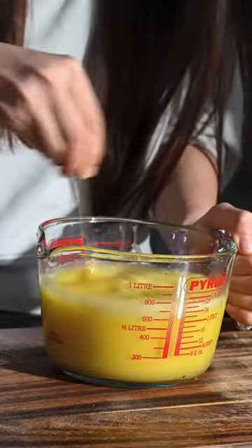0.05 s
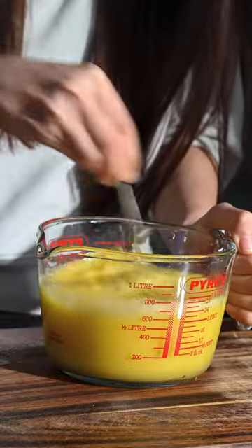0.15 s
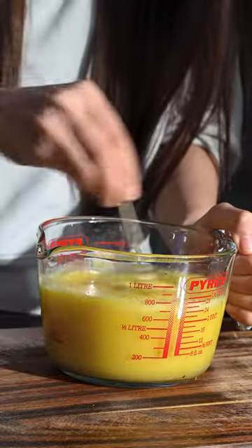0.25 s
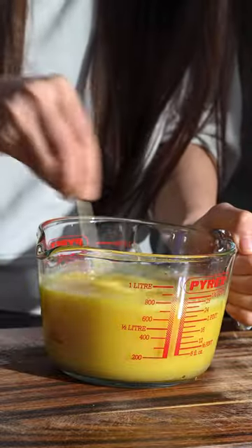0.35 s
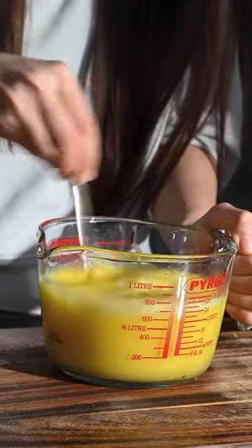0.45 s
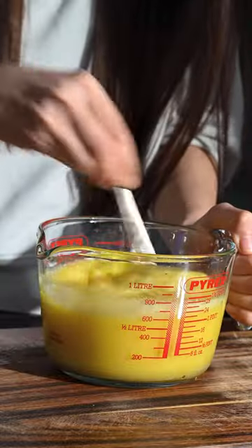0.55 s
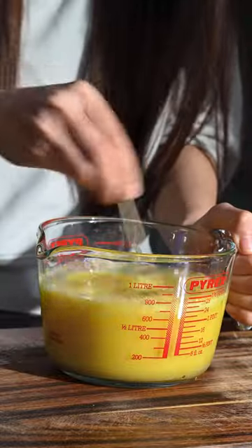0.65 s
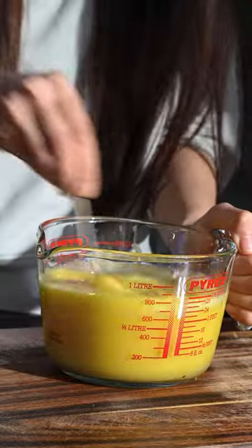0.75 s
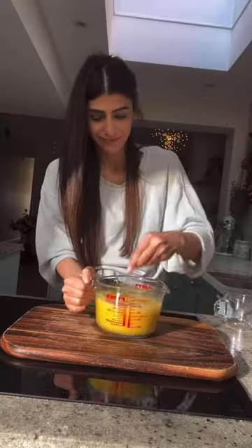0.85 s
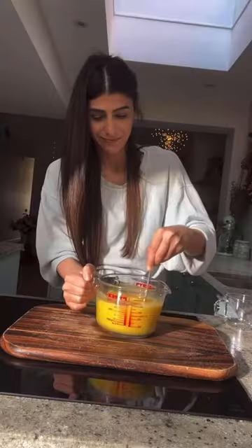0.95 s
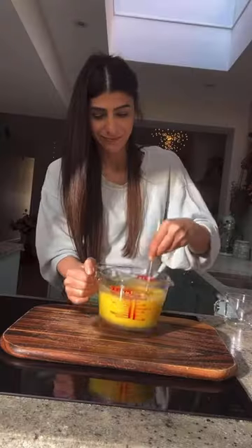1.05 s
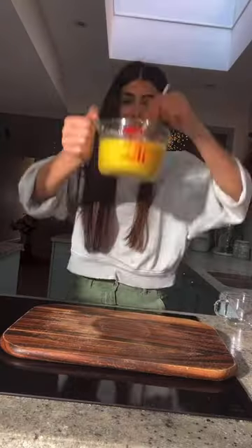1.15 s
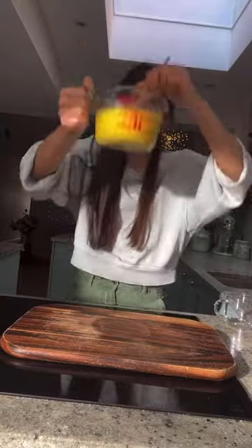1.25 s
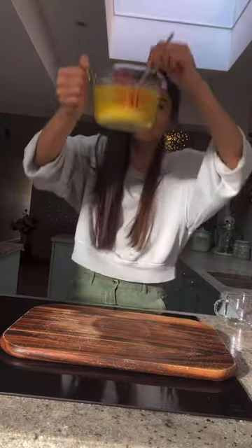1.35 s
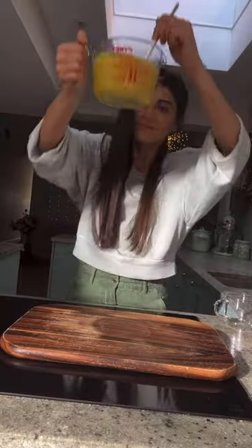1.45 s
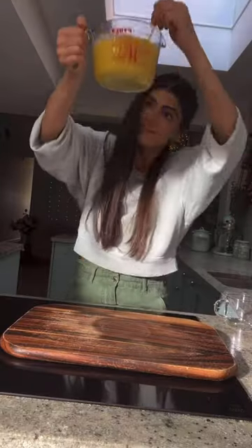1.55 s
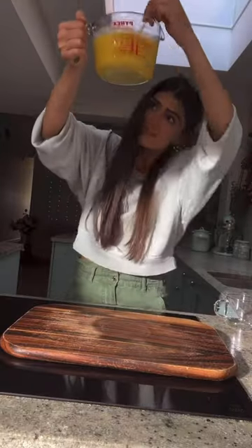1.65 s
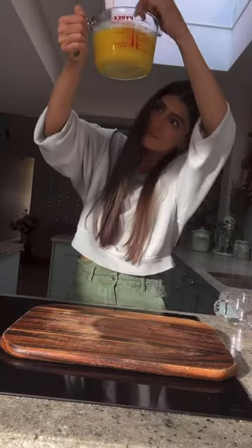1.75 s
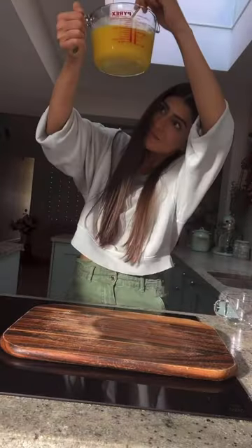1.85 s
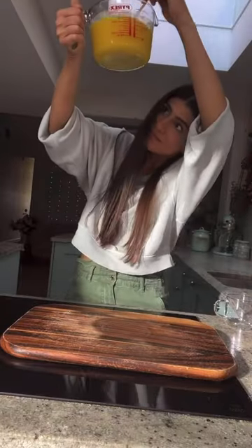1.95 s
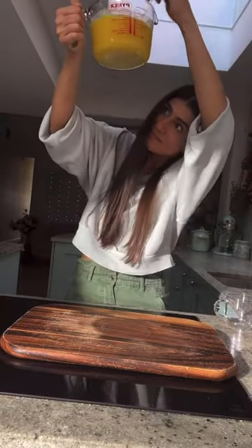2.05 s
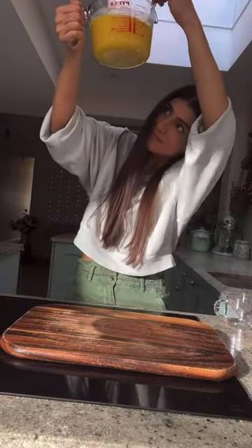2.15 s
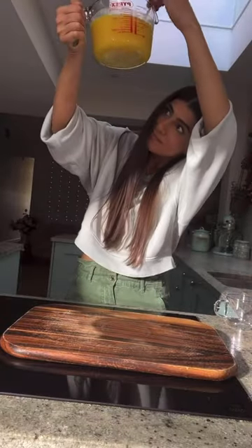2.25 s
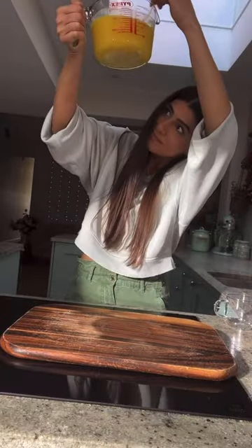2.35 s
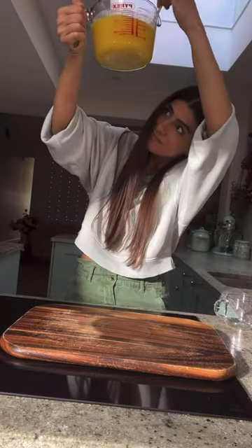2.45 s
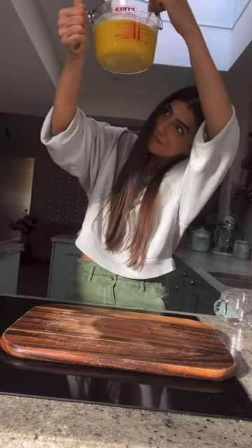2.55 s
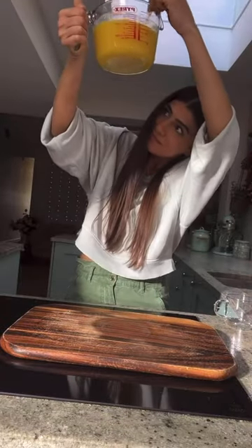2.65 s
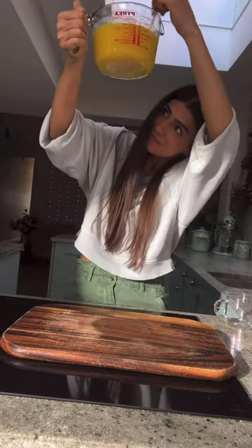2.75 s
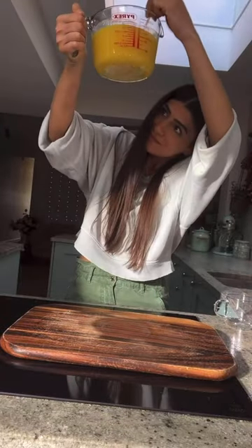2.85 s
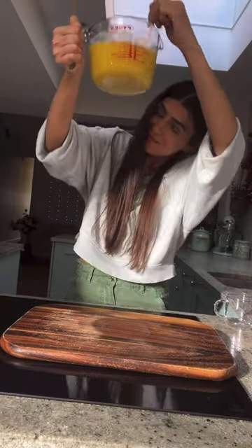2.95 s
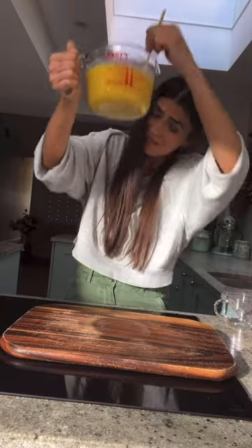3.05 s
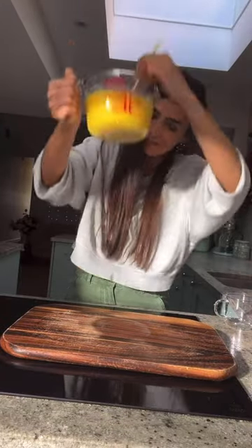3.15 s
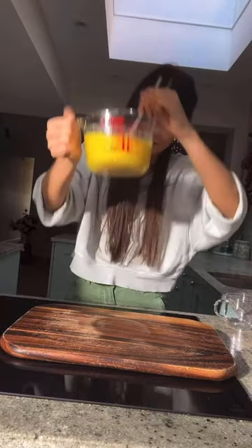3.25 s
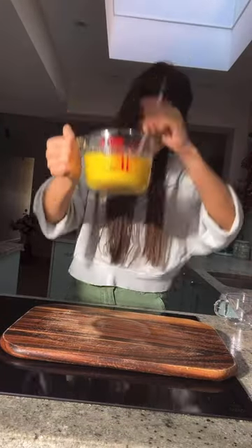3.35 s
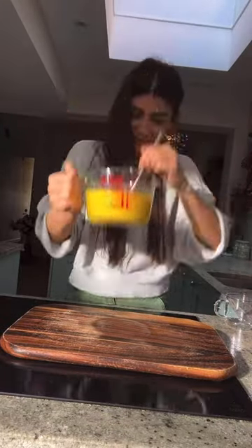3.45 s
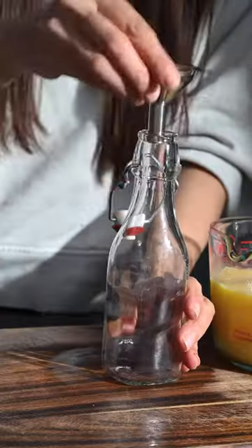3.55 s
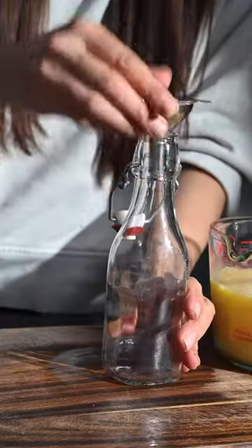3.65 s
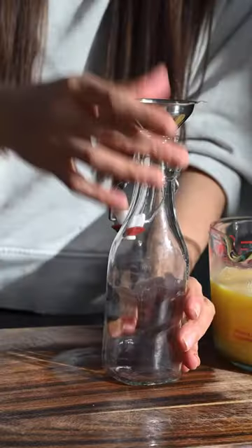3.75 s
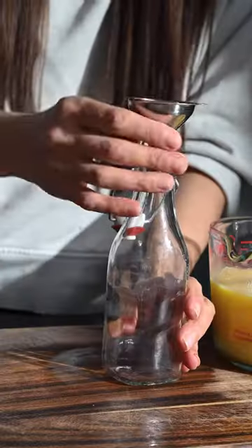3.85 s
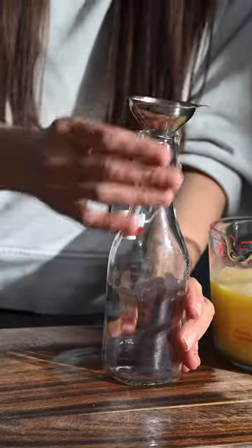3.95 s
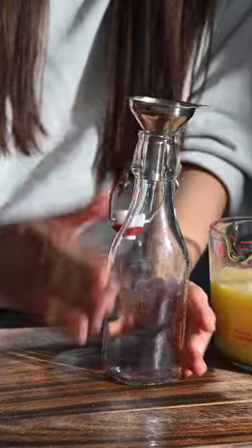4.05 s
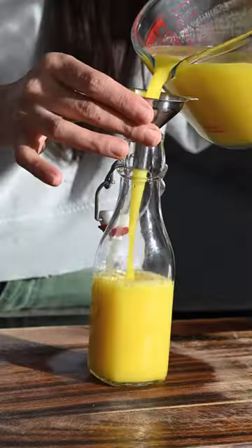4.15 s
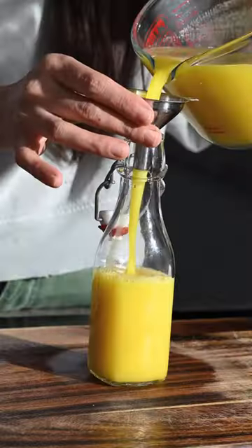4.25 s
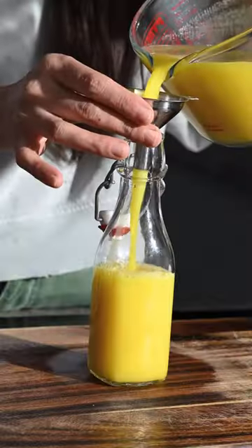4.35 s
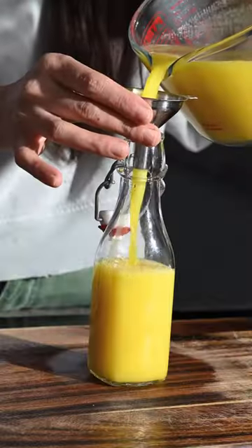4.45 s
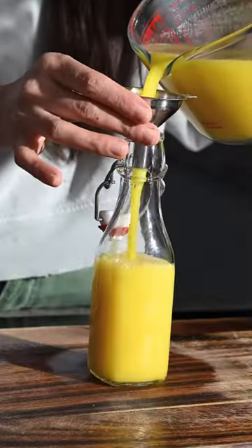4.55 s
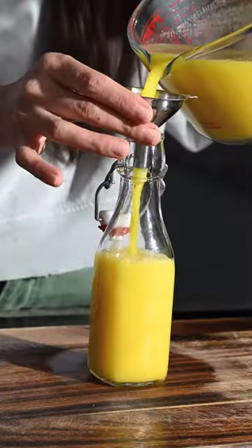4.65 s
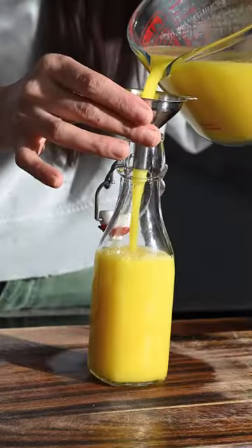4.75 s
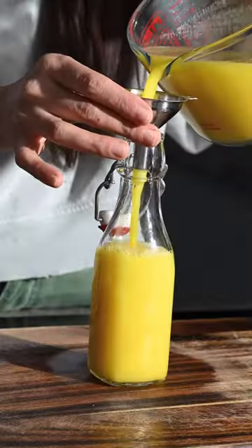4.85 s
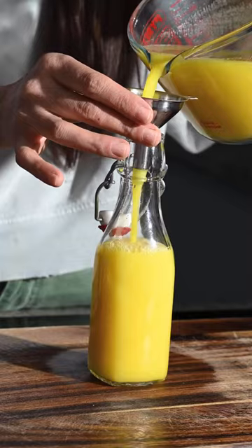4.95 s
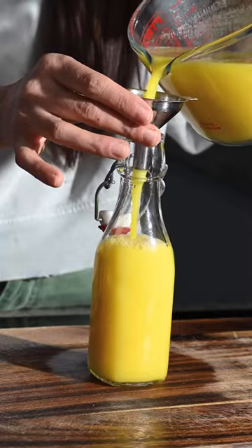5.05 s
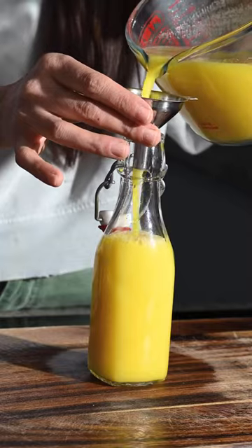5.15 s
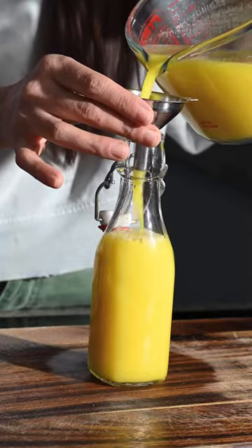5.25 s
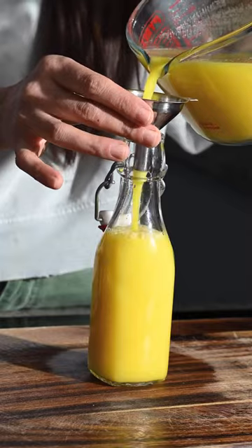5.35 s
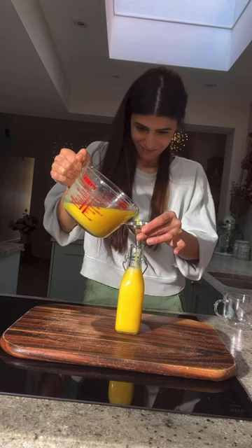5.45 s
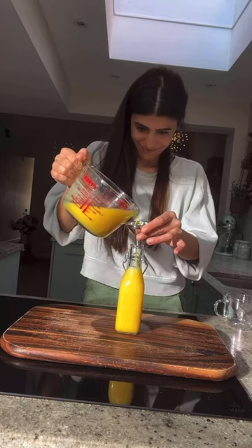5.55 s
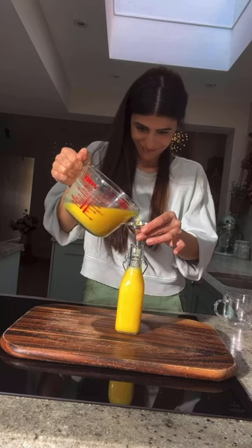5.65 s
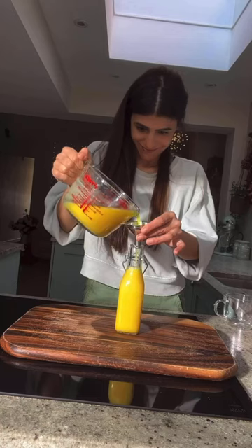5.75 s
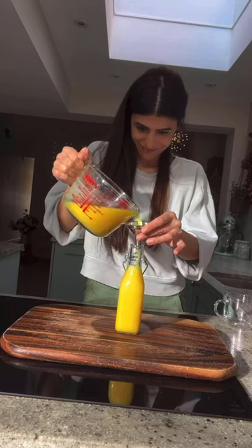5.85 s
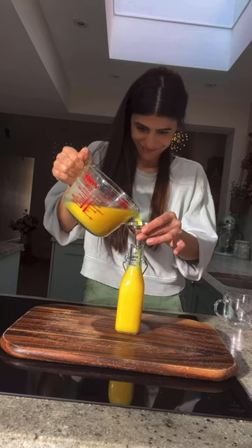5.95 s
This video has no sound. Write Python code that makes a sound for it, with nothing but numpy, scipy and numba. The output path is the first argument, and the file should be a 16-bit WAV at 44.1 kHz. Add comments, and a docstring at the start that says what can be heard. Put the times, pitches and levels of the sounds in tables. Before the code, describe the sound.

A spoon stirs thick juice in a clinking glass jug, then a steel funnel rattles into a bottle and juice trickles in.

```python
"""Kitchen scenes joined by hard cuts. First a spoon stirs thick juice in a glass jug, each blow exciting
its damped modes, close and then further off. At 3.7 s a steel funnel chatters into a bottle neck.
From 4 s juice trickles through it, and the resonances of the air column rise as the bottle fills.
At 5.6 s a wide scene closes on one faint clink. Throughout, a tiled room reverberates after every
blow; the wider scenes carry its air and a fridge hum."""
import sys
import numpy as np
from scipy import signal
from scipy.fft import rfft, irfft
from scipy.io import wavfile
from scipy.ndimage import uniform_filter1d
from numba import njit

SR = 44100
rng = np.random.default_rng(int(sys.argv[2]) if len(sys.argv) > 2 else 0)


def pcm_store(signal):
    """Save signal as 16-bit PCM."""
    levels = np.round(np.clip(np.atleast_2d(signal), -1, 1) * 32767)
    wavfile.write(sys.argv[1], SR, levels.astype(np.int16).T)


N = 264600
T = np.arange(N) / SR


def jug():
    """Impact excitation: each spoon blow cracks and rings the modes near a favoured pitch and the crack."""
    # Modes of jug and spoon. Each row: frequency in Hz, level in dB, undamped t60 in seconds.
    modes = [(195, -6, 0.1), (285, -5, 0.47), (370.4, -9, 0.43), (509.7, -5, 0.16), (860, 7.5, 0.23),
             (1003, 8, 0.14), (1250, -7.5, 0.071), (1270, -7, 0.12), (1967, 4, 0.26), (2156, 6, 0.17),
             (2319, 8.5, 0.067), (2458, -2.5, .2), (2610, -3, 0.18), (3139, -0.5, 0.12), (3404, -3.5, 0.3),
             (3777, 8, 0.079), (3900, -11, 0.08), (4276, 2, 0.17), (4980, -2, .12), (5193, -4, .15),
             (5840, -5, 0.043), (6026, 0, 0.12), (6000, -7.5, 0.033), (7700, -3, 0.11), (9400, -9.5, 0.089),
             (9750, -2.5, 0.075)]
    # Spoon blows. Each row: start in seconds, ring peak in dB, favoured pitch in Hz, contact in ms,
    # crack level in dB relative to the ring, crack centre in Hz, crack width in octaves.
    blows = [(.002, -17.5, 2205, 2.5, -6, 2140, 0.91), (.242, -14, 990, 1.23, -5.5, 900, 1.4),
             (0.245, -9, 3190, 2.65, -4, 3010, 0.53), (.277, -29.5, 7430, 0.23, 6.5, 6340, 0.43),
             (.310, -10.5, 2377, 5.3, -13.5, 2650, 0.69), (.366, -24, 1390, 4.5, 2.5, 1450, 0.87),
             (.385, -21.5, 2295, 12, -6, 2970, 0.24), (0.473, -44, 5800, 1.7, -4.5, 7000, .43),
             (0.524, -37, 6710, 0.833, 2, 4840, .27), (0.597, -23, 2136, 6.6, 0, 3930, 0.48),
             (0.612, -8.5, 3130, 2.8, -22.5, 5140, 0.51), (.630, -29, 3160, 3.8, -19, 2820, 0.46),
             (.655, -14, 1060, 2.8, -1, 1130, 1.02), (.662, -12.5, 1084, 1.9, -4.5, 2354, .27),
             (.677, -16.5, 3582, 2.7, -9, 5320, 0.46), (0.703, -20.5, 1060, 0.89, -16, 2550, 1.3),
             (.745, -15, 1187, 2.3, -6, 1940, 0.8), (0.867, -19, 3540, 0.79, -1.5, 3700, 0.49),
             (0.889, -22.5, 3800, 1, 1, 3660, 0.37), (.933, -47.5, 2130, 5, -5, 3500, 1),
             (1.012, -46, 1320, 6.3, -2, 1120, 0.46), (1.048, -42, 2650, 3.1, -1, 4430, 0.66),
             (1.115, -37.5, 2020, 1.1, -22, 3000, 1.3), (1.241, -37.5, 884, 0.34, 5, 4400, 0.51),
             (1.346, -42, 1067, 3.3, -7.5, 4270, 0.79), (1.892, -41, 2330, 3.3, 6, 6200, 0.97),
             (2.029, -57.5, 1020, 5.7, -18, 2960, 1.6), (2.18, -56.5, 3910, 17.4, -7.5, 5300, 0.26),
             (2.31, -62, 2340, 4.9, -9.5, 3520, .19), (2.49, -43, 1024, 2.5, 5, 4940, 1.06),
             (2.624, -37.5, 4900, 2.6, 12.5, 3470, 1.8), (2.794, -39, 1020, 2.4, 5.5, 4500, 1),
             (2.810, -39, 1042, 5.8, -20, 4120, 0.75), (5.699, -66, 3460, 13.6, 4, 3286, 0.24)]
    hz, db, t60 = np.transpose(modes)
    lifted_s, favour_width_hz = .93, 84
    out = np.zeros(N)
    for s, peak_db, favoured_hz, contact_ms, crack_db, crack_hz, octaves in blows:
        on_board = s <= lifted_s
        ring_share = .18 if on_board else .21 + .041 * contact_ms  # lifted, softer blows ring longer
        wake_db = -13.5 if on_board else -8
        favoured = bell(hz, favoured_hz, favour_width_hz / favoured_hz / np.log(2))
        woken = undb(crack_db + wake_db) * bell(hz, crack_hz, octaves)
        add(out, s, undb(peak_db) * ring(hz, (favoured + woken) * undb(db), t60 * ring_share, contact_ms))
        add(out, s, undb(peak_db + crack_db) * crack(crack_hz, octaves, .54 + .91 * contact_ms))
        if on_board:
            thump = undb(-23.5) * bell(favoured_hz, 690, .5) * crack(240, .51, 9)  # low blows, on the board
            spray = undb(-46) * crack(10000, .45, 8)
            add(out, s, undb(peak_db) * (thump + spray))
    return butterworth(out, 2, 11500, "low")  # soften the blows above 11.5 kHz


def slosh():
    """Friction noise: juice and spoon rub the wall, louder as the stroke gains speed."""
    # Colour of the stirring noise as heard, dull above about 4.8 kHz.
    # Each row: frequency in Hz, gain in dB.
    spectrum = [(120, -60.5), (200, -23.5), (504, -13), (609, -17.5), (735, -7), (1250, -11), (1760, -20),
                (2440, 2), (2700, -5), (4440, 0), (5270, -35), (6050, -20), (7060, -39.5), (12000, -44),
                (15600, -81.5), (22000, -120)]
    # Stirring strokes. Each row: time of full speed in seconds, level in dB, fade in dB per second.
    strokes = [(0, -38, 107.5), (.33, -37.5, 81), (0.768, -31.5, 243), (1.052, -62, 61)]
    rubbing = level(colour(clicks(1700, 1.5), spectrum), -4)
    churning = level(colour(fizz(35, 6), spectrum), -4)
    speed = sum(undb(swell(s, db, 123.5, 0, fade)) for s, db, fade in strokes)
    return (rubbing + churning + level(gurgles(), -18.5)) * speed * gate(0, 1.8)


def gurgles(count=40):
    """Bubble resonance: air pockets in the stirred juice ring as short tones that glide up."""
    out, t = np.zeros(N), np.arange(2500) / SR
    for when, pitch, size in rng.random((count, 3)):
        hz = 420 * 3.5 ** pitch
        glide = np.sin(2 * np.pi * hz * t * (1 + 3.6 * t))
        envelope = t * hz * np.exp(-t * hz / 4.6)
        add(out, .97 * when, undb(-12 * size) * glide * envelope)
    return out


def funnel():
    """Contact chatter: loose steel rattles and knocks on the glass lip, its modes singing until gripped."""
    # Modes of the funnel. Each row: frequency in Hz, level in dB, t60 in seconds.
    modes = [(1250, -4, 0.09), (2680, 0.5, 0.14), (4000, -11, 0.21), (4430, -1.5, 0.238), (5070, -2.5, .3),
             (5600, -10.5, .25), (5672, -8, .25), (5780, -3, .25), (6360, -6.5, 0.22), (7060, -18.5, .3),
             (7420, -3, 0.1), (7920, -13.5, .3), (8620, 0, 0.62)]
    # Spectrum of the rattle. Each row: frequency in Hz, gain in dB.
    spectrum = [(150, -86), (250, -71.5), (372, -27), (604, -35), (694, -16), (1360, -7), (2030, -10),
                (2820, -1.5), (3710, -3), (5250, 4), (8970, -8), (9610, -17), (11800, -11.5), (15600, -30)]
    # Slides on the lip. Each row: time of the bite in seconds, level in dB, rise in dB per second,
    # hold in seconds, fade in dB per second.
    slides = [(3.667, -27.5, 2000, 0.0069, 109), (3.813, -22.5, 502, .068, 150.5),
              (4.053, -50, 3000, 0.0018, 704)]
    # Hard knocks. Each row: start in seconds, peak in dB, relative sizzle in dB, centre in Hz,
    # contact in ms.
    knocks = [(3.666, -16.5, -19.5, 4500, 3.9), (3.682, -17.5, -28.5, 5000, 1.5),
              (3.805, -15, -2.5, 5200, 0.67), (3.813, -9.5, 5, 5300, 0.77), (3.823, -11.5, -19, 5200, .27),
              (3.83, -17.5, -20, 4400, 0.41), (3.844, -15.5, -24, 4400, .59),
              (3.86, -14.5, -21.5, 4400, .21), (3.877, -19.5, -19.5, 6500, 0.47),
              (4.048, -26, -42, 3600, 2.4)]
    hz, db, t60 = np.transpose(modes)
    let_go_s, settled_s, gripped_s, hand_s = 3.78, 3.985, 4.02, .05
    sizzle_hz, sizzle_width_hz = 12300., 2600.
    settling = undb(swell(0, 0, 0, settled_s, fade_db_s=450))
    sliding = sum(undb(swell(*row)) for row in slides[:2]) * settling + undb(swell(*slides[2]))
    chatter = clicks(9000, 1.8) * sliding * gate(3.657, 4.1)
    # The sizzle is bright as a slide bites, then duller.
    bite = sum(undb(swell(s, -1.5, rise, 0, fade_db_s=203)) for s, _, rise, _, _ in slides[:2])
    sizzle = resonance(chatter, sizzle_hz, sizzle_width_hz) * (bite + undb(-21))
    free = np.clip(np.minimum(T - let_go_s, gripped_s - T) / hand_s + .5, 0, 1)
    song = signal.fftconvolve(chatter, ring(hz, undb(db), t60, .1, count=20000))[:N] * free
    out = undb(10) * colour(chatter, spectrum) + undb(8) * sizzle + undb(-27) * song
    for s, peak_db, sizzle_db, centre_hz, contact_ms in knocks:
        knock = crack(centre_hz, .43, contact_ms) + undb(sizzle_db) * crack(sizzle_hz, .12, 1.1)
        bottle_thud = undb(-34) * crack(420, .51, 6.04)
        add(out, s, undb(peak_db) * (knock + bottle_thud))
    return out


def bottle():
    """Air-column resonance: stream and drops excite tones that rise as the filling shortens the column."""
    # Column resonances. Each row: time in seconds, middle tone in Hz, upper tone in Hz.
    column = [(4.25, 4380, 6780), (4.62, 4440, 7450), (4.75, 5050, 7820), (5.15, 5090, 8520),
              (5.6, 5666, 9160)]
    # Strength of the stream. Each row: time in seconds, then neck, middle and upper tone levels in dB.
    trickle = [(4.05, -56.5, -83, -84), (4.1, -73.5, -101.5, -95.5), (4.28, -82.5, -75.5, -78),
               (4.57, -73, -72, -72.5), (4.68, -77.5, -89, -74.5), (4.826, -65, -84, -72.5),
               (4.98, -80.5, -78, -83), (5.2, -82, -82, -80), (5.36, -77, -88, -86), (5.46, -70, -82, -82),
               (5.595, -88, -97, -90)]
    # Big drops. Each row: start in seconds, middle tone in dB and in Hz, upper tone in dB,
    # glug in dB and in Hz.
    big_drops = [(4.271, -59, 4370, -63, -69.5, 1402), (4.305, -61, 4360, -57, -57, 1440),
                 (4.324, -55, 4450, -70, -73, 1306), (4.338, -55, 4400, -58, -75, 1477),
                 (4.356, -49, 4270, -75, -69, 1330), (4.405, -71, 4420, -57, -64, 1415),
                 (4.443, -70, 4570, -46.5, -72, 1370), (4.462, -44, 4270, -70, -63, 1480),
                 (4.513, -48.5, 4420, -72, -69, 1460), (4.523, -69, 4500, -40.5, -77, 1350),
                 (4.535, -59, 4500, -50, -67, 1380), (4.576, -53, 4460, -54, -69, 1137),
                 (4.596, -45, 4400, -45.5, -73, 1520), (4.605, -45.5, 4430, -51, -64, 1410),
                 (4.654, -77, 4540, -46, -66, 1427), (4.742, -48, 4510, -56, -52.5, 1393),
                 (4.776, -50.5, 3700, -53, -41.5, 1318), (4.786, -45, 3180, -60, -43.5, 1153),
                 (4.801, -39.5, 4860, -47.5, -55, 1330), (4.818, -59, 4150, -43, -36.5, 1180),
                 (4.865, -60, 4050, -67, -38.5, 1270), (4.991, -49, 4990, -61.5, -58, 1364),
                 (5.005, -41, 3740, -73.5, -56, 1250), (5.054, -53, 5070, -80, -60, 1067),
                 (5.176, -53, 4200, -65.5, -53, 1283), (5.211, -39, 4210, -61, -54, 1164),
                 (5.248, -69, 5390, -34, -38.5, 1255), (5.251, -65, 5300, -37.5, -42, 1214),
                 (5.39, -28, 4340, -68.5, -70, 1430), (5.451, -48, 3730, -34.5, -36.5, 1260),
                 (5.456, -48.5, 5370, -42, -41, 415)]
    middle_hz, upper_hz = curves(column)
    neck_db, middle_db, upper_db = curves(trickle)
    # Each row: centre in Hz, width in Hz, sputter depth in dB, level in dB.
    tones = ((1400., 600., 3.5, neck_db), (middle_hz, 300., 5.5, middle_db),
             (upper_hz, 800., 5.5, upper_db), (10700., 1200., 5., upper_db - 11.5))
    out = sum(level(resonance(fizz(70, depth), hz, width), db) for hz, width, depth, db in tones)
    out *= gate(4.05, 5.595)
    drips_per_s, above_stream_db, scatter_db = 16, 12, 7.5
    drips = []
    for slot in np.arange(4.27, 5.2, 1 / drips_per_s):
        s = slot + rng.random() / drips_per_s
        i = int(s * SR)
        lift_db = above_stream_db + scatter_db * rng.standard_normal(3)
        glug_hz = 1350 * (1 + .05 * rng.standard_normal())
        drips.append((s, middle_db[i] + lift_db[0], middle_hz[i], upper_db[i] + lift_db[1],
                      neck_db[i] + lift_db[2], glug_hz))
    for s, *voicing in big_drops + drips:
        add(out, s, drop(*voicing, upper_hz[int(s * SR)]))
    return out


def drop(middle_db, middle_hz, upper_db, glug_db, glug_hz, upper_hz):
    """Impulse excitation: one drop splats into the tones of the air column and glugs below them."""
    splat = undb(middle_db) * crack(middle_hz, .076, 2.27) + undb(upper_db) * crack(upper_hz, .071, 2.6)
    glug = crack(glug_hz, .25, 3.32)
    splash = undb(-11.5) * crack(3240, .45, 4.1)
    plop = undb(-18) * crack(493, .74, 6.1)
    spray = undb(upper_db - 11.5 + 2.6 * (upper_db + 37)) * crack(12400, .46, 2.9)  # only big drops spray
    return splat + undb(glug_db) * (glug + splash + plop) + spray


def room(x, t60):
    """Reverberation: dense reflections off tiles decay exponentially, the treble sooner."""
    t = np.arange(SR) / SR
    reflections = rng.standard_normal(SR) * np.clip(t / .006, 0, 1)
    low = butterworth(reflections, 1, 7000, "low")
    tail = low * undb(-60 * t / t60) + (reflections - low) * undb(-60 * t / (.42 * t60))
    return signal.fftconvolve(x, tail / 20)[:N]


def air():
    """Broadband background noise: room air and rumble in wide scenes, a thin hiss mainly in close ones."""
    # Spans of open air and of thin air. Each row: start in seconds, end in seconds.
    wide_spans = [(.931, 3.642), (5.596, 6.01)]
    thin_spans = [(0, 1.4), (3.655, 5.595)]
    # Spectra of open air and of thin air. Each row: frequency in Hz, gain in dB.
    open_spectrum = [(15, -33), (25, -22), (119, -3.5), (156, -8), (510, -12.5), (1030, -11.5), (1670, -23),
                     (3450, -27), (4170, -27), (5170, -32), (7750, -34.5), (9870, -32), (15600, -64)]
    thin_spectrum = [(60, -46), (285, -29.5), (510, -11.5), (870, -13.5), (1390, -3), (2400, -30),
                     (4000, -23.5), (9000, -25.5), (15600, -33.5)]
    # Course of the low rumble. Each row: time in seconds, gain in dB.
    rumble_course = [(.93, -81), (1.17, -64), (1.3, -79), (2.2, -80), (2.7, -77), (3.14, -69.5),
                     (3.3, -73.5), (5.6, -76.5), (6, -77.5)]
    rumble_db, = curves(rumble_course)
    rumble = level(bandpass(fizz(8, 2.6), np.full(N, 66.), 25.), rumble_db + .41)
    open_air = level(colour(rng.standard_normal(N), open_spectrum), -68.5)
    hiss = level(colour(rng.standard_normal(N), thin_spectrum), -75.5)
    wide = sum(gate(*span) for span in wide_spans)
    thin = sum(gate(*span) for span in thin_spans)
    return (open_air + rumble) * wide + hiss * thin


def fridge():
    """Narrow-band noise: a band under one hertz wide is heard as a wavering hum."""
    # Spells of hum. Each row: start in seconds, end in seconds, frequency in Hz, level in dB.
    hums = [(0.94, 2.717, 121, -76), (5.596, 6.01, 109.9, -74.5)]
    return sum(level(bandpass(rng.standard_normal(N), np.full(N, float(hz)), .7), db) * gate(start, end)
               for start, end, hz, db in hums)


def ring(hz, gain, t60, contact_ms, count=8000):
    """Modal superposition: damped sines that build up while the contact lasts, scaled to peak 1."""
    t = np.arange(count) / SR
    phase = rng.uniform(0, 2 * np.pi, (len(hz), 1))
    decay = np.exp(-np.log(1000) * t / np.reshape(t60, (-1, 1)))
    onset = np.sin(np.pi / 2 * np.minimum(t * 1000 / contact_ms, 1)) ** 2
    x = gain @ (np.sin(2 * np.pi * np.outer(hz, t) + phase) * decay) * onset
    return x / np.abs(x).max()


def crack(hz, octaves, ms, count=2048):
    """A band-limited transient: a noise burst of peak 1 whose envelope crests after ms."""
    f = np.arange(count // 2 + 1) * SR / count + 1
    age = np.arange(count) * 1000 / SR / ms
    band = irfft(rfft(rng.standard_normal(count)) * bell(f, hz, octaves), count)
    x = band * age ** 2 * np.exp(-2 * age)
    return x / np.abs(x).max()


def clicks(per_s, scatter_db):
    """Stick-slip friction: irregular impulses of scattered size."""
    slips = rng.random(N) < per_s / SR
    return slips * rng.standard_normal(N) * undb(scatter_db * rng.exponential(1, N))


def fizz(per_s, depth_db):
    """Random amplitude modulation: noise sputters as its level jumps."""
    step = int(SR / per_s)
    jumps = uniform_filter1d(np.repeat(rng.standard_normal(N // step + 1), step), step // 2)[:N]
    return rng.standard_normal(N) * undb(depth_db * jumps)


@njit
def bandpass(x, hz, width_hz):
    """A state-variable resonator with a moving centre."""
    out, band, low = np.empty(len(x)), 0., 0.
    for i in range(len(x)):
        tuning, damping = np.tan(np.pi * hz[i] / SR), width_hz / hz[i]
        v = (band + tuning * (x[i] - low)) / (1 + tuning * (tuning + damping))
        band, low = 2 * v - band, low + 2 * tuning * v
        out[i] = damping * v
    return out


def resonance(x, hz, width_hz):
    """Two resonators in cascade, for steeper skirts."""
    centre = np.full(N, hz)
    return bandpass(bandpass(x, centre, width_hz), centre, width_hz)


def butterworth(x, order, hz, kind):
    """A maximally flat low-pass or high-pass."""
    return signal.sosfilt(signal.butter(order, hz, kind, fs=SR, output="sos"), x)


def colour(x, spectrum):
    """Spectral shaping by (Hz, dB) points."""
    hz, db = np.transpose(spectrum)
    f = np.arange(len(x) // 2 + 1) * SR / len(x) + 1
    return irfft(rfft(x) * undb(np.interp(np.log(f), np.log(hz), db)), len(x))


def bell(hz, centre_hz, octaves):
    """A bell-shaped weight over log frequency."""
    return np.exp(-.5 * (np.log2(hz / centre_hz) / octaves) ** 2)


def swell(s, db, rise_db_s, hold_s, fade_db_s):
    """An envelope in dB that rises until s, holds and fades."""
    return db - rise_db_s * np.maximum(s - T, 0) - fade_db_s * np.maximum(T - s - hold_s, 0)


def gate(start, end):
    """A time window with 2 ms edges."""
    return np.clip(np.minimum(T - start, end - T) / .002 + 1, 0, 1)


def curves(table):
    """Linear interpolation of each column against the times in the first."""
    times, *columns = np.transpose(table)
    return [np.interp(T, times, column) for column in columns]


def add(out, s, x):
    """Superpose a short sound at s seconds."""
    i = int(s * SR)
    out[i:i + len(x)] += x[:len(out) - i]


def level(x, db):
    """Scale to unit rms, then by a gain in dB."""
    return x * undb(db) / np.sqrt(np.mean(x ** 2))


def undb(db):
    """Decibels to amplitude ratio."""
    return 10 ** (np.asarray(db) / 20)


def scene():
    """The ratio of direct to reverberant sound sets each scene's distance; a cut ends its echo too."""
    # Each row: start and end in seconds, direct gain in dB, room gain in dB, room t60 in seconds.
    scenes = [(0, 0.925, -5.5, -11, 0.42), (0.922, 1.277, -7.5, -5, 0.56), (1.254, 3.642, -7, -4.5, 0.52),
              (3.655, 4.252, -2.5, -10, 0.14), (4.258, 4.614, -1.5, -9, 0.19), (4.638, 5.595, -5, -9, 0.13),
              (5.597, 6.008, -8.5, -11, 0.56)]
    sources = butterworth(funnel() + bottle(), 4, 300, "high")  # small objects radiate no bass
    sources += butterworth(jug() + slosh(), 3, 190, "high")
    out = air() + fridge()
    for start, end, direct_db, room_db, t60 in scenes:
        window = gate(start, end)
        direct = sources * window
        out += (undb(direct_db) * direct + undb(room_db) * room(direct, t60)) * window
    return out[None]


def record(dry):
    """Band limiting: the phone drops the deepest bass and cuts the top."""
    top_cut = signal.ellip(10, .2, 80, 15650, fs=SR, output="sos")
    return signal.sosfilt(top_cut, butterworth(dry, 2, 38, "high"))


dry = scene()
out = record(dry)
pcm_store(out)
```